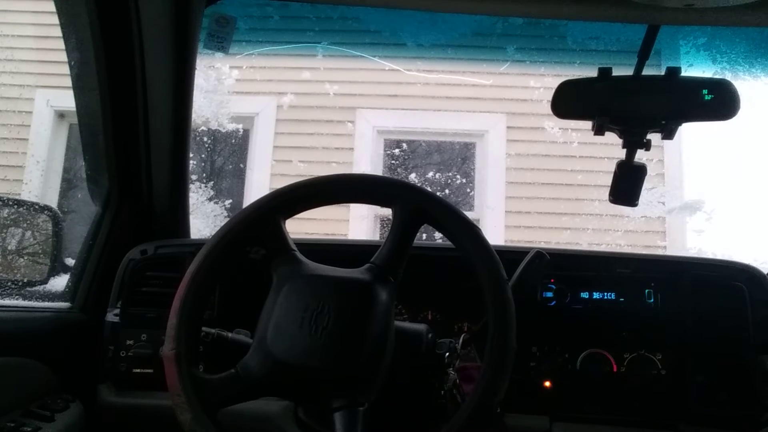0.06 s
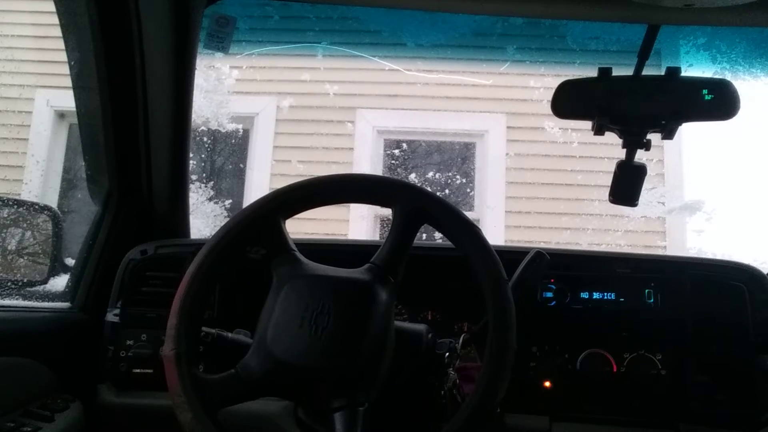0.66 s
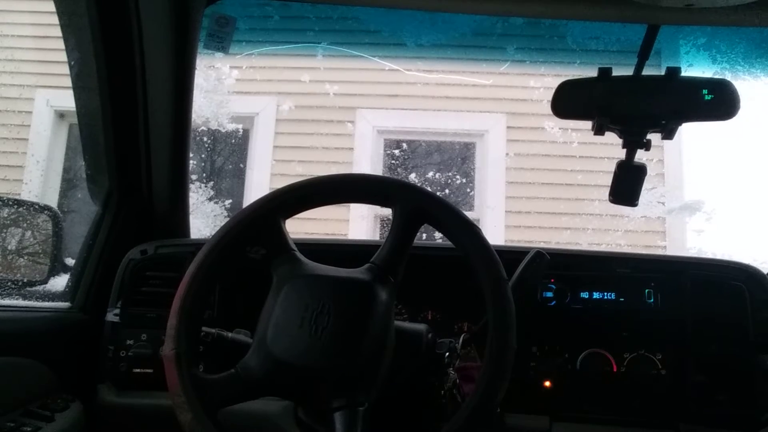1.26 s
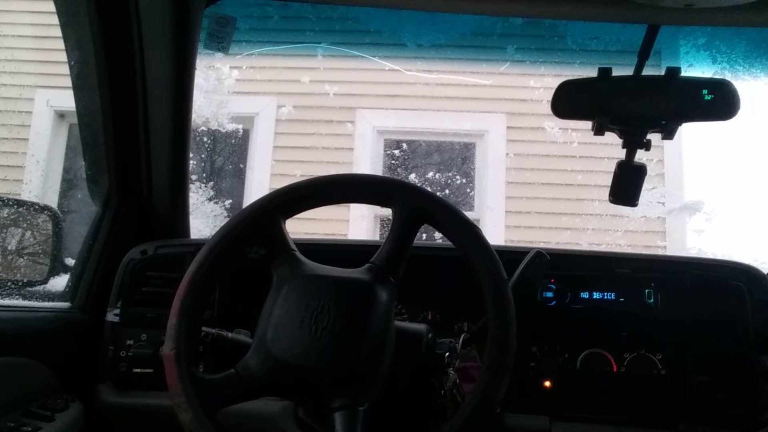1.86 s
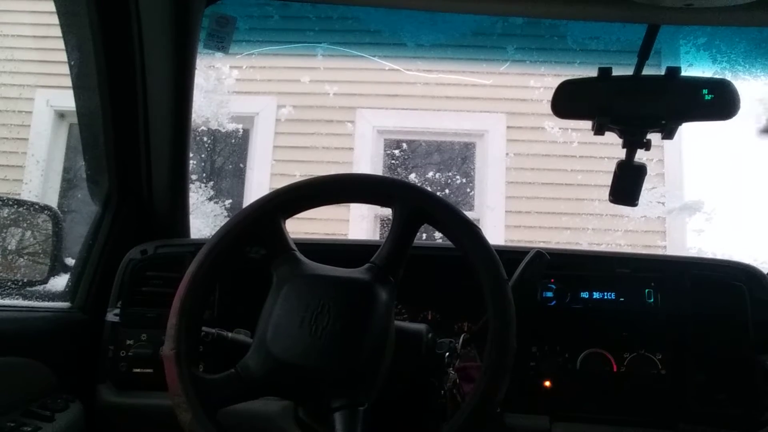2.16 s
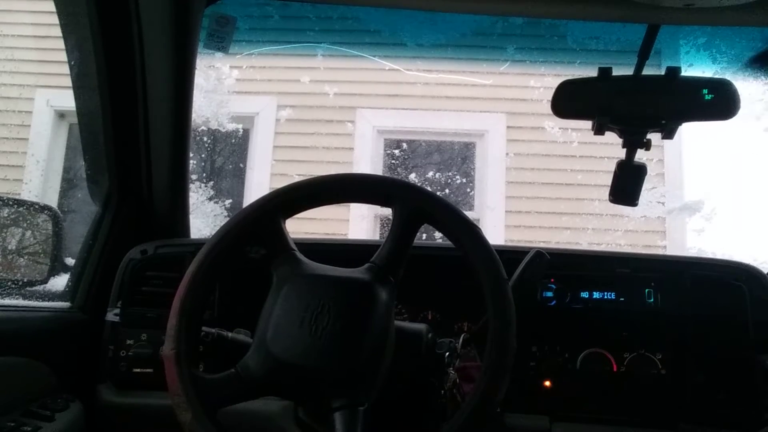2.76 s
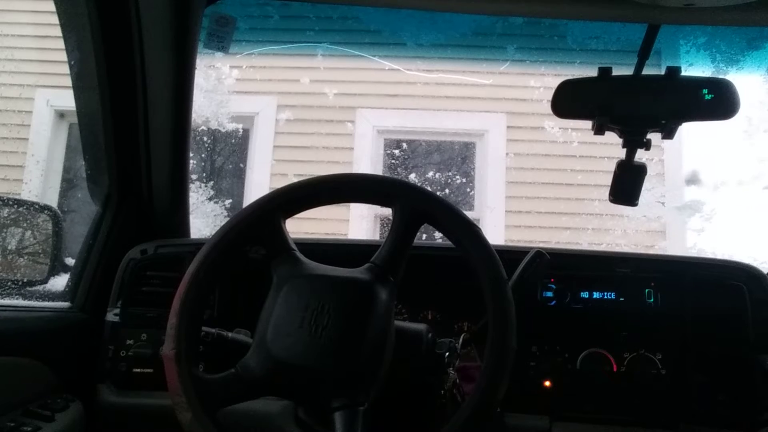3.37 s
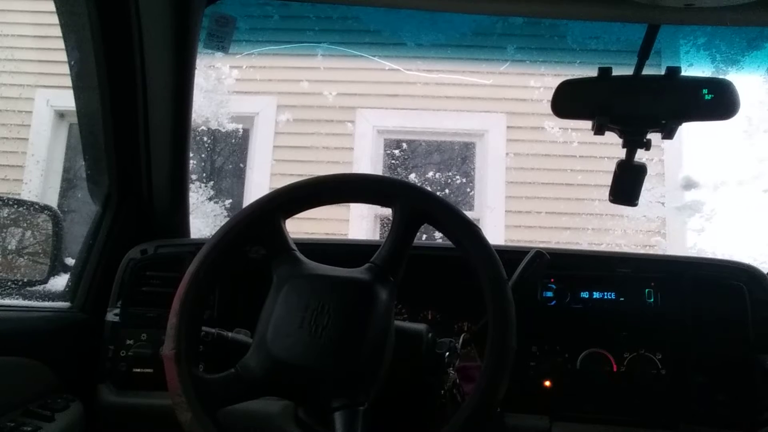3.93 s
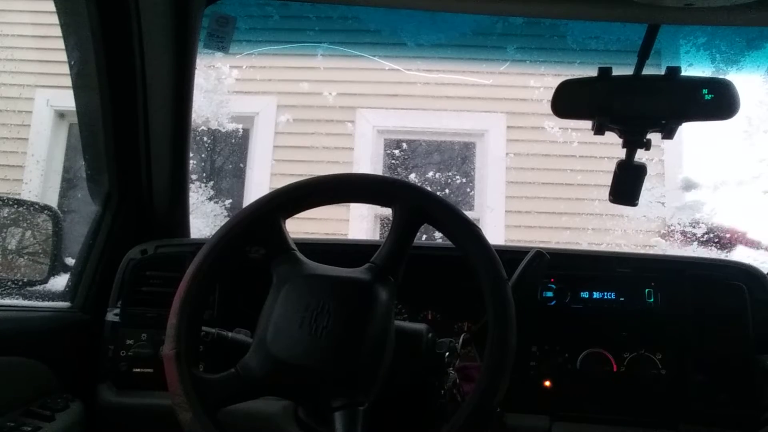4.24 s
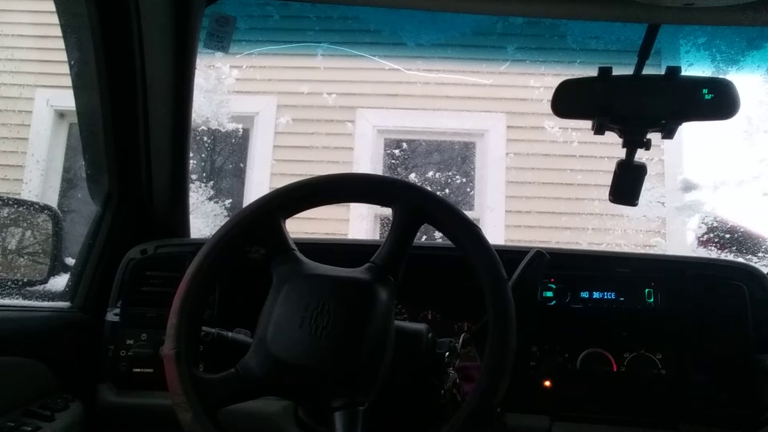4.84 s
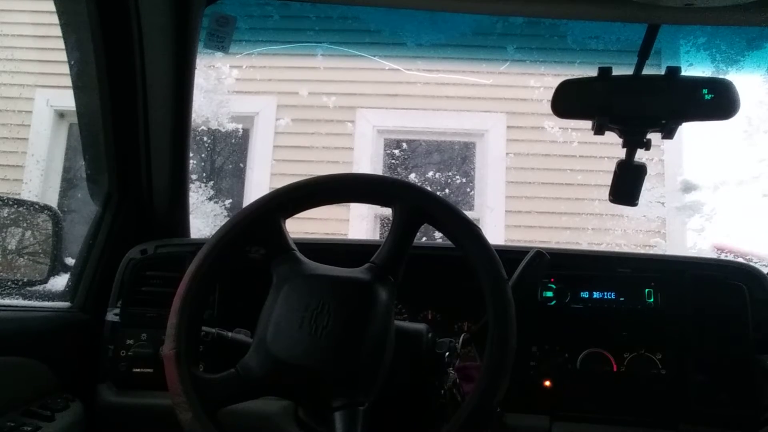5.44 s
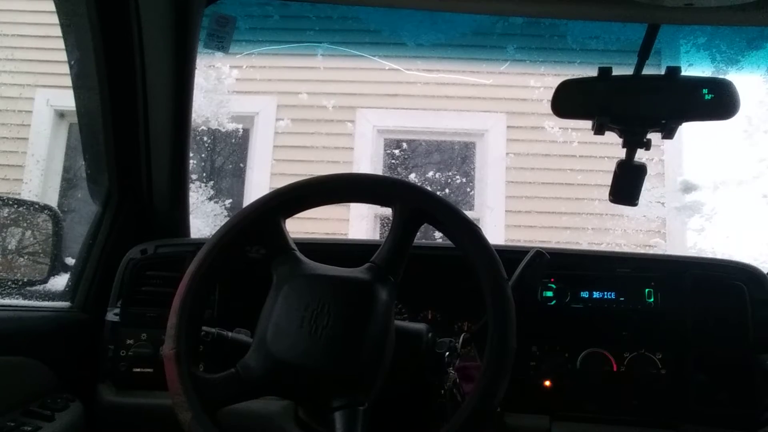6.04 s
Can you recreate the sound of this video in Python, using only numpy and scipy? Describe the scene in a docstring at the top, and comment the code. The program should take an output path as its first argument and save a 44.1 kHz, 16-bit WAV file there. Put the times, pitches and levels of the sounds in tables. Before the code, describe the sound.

Over a steady engine and fan drone in a truck cab, ice is scraped off the windshield in short chipping jabs and three longer strokes.

```python
"""Inside the cab of an idling truck, one microphone, a plastic scraper just beyond the icy windshield.
Engine and heater fan drone throughout. From the start the blade jabs at the ice, squeaks and breaks off
chips; glass and blade ring into the cab. From 0.7 s come three long strokes, rasping as they crush the
frost, the arm leaning in once in each. After 3 s a few faint jabs die away, and at 5 s the scraper
taps the pane once, lightly."""
import sys
import numpy as np
from scipy import signal
from scipy.fft import rfft, irfft
from scipy.io import wavfile
from scipy.ndimage import uniform_filter1d, minimum_filter1d

SR = 44100
rng = np.random.default_rng(int(sys.argv[2]) if len(sys.argv) > 2 else 0)


def persist_wave(psi):
    """Save psi, clipped to +-1, as 16-bit WAV."""
    counts = np.round(np.clip(psi, -1, 1) * 32767).astype(np.int16)
    wavfile.write(sys.argv[1], SR, np.atleast_2d(counts).T)


N = 269010
TIME, FREQS = np.arange(N) / SR, np.fft.rfftfreq(N, 1 / SR)


def gain_of(db):
    """Decibels to gain."""
    return 10 ** (np.asarray(db) / 20)


def unit_rms(x):
    """Scaled to an rms of 1."""
    return x / np.sqrt(np.mean(x ** 2) + 1e-20)


def curve_at(points, hz):
    """Points joined by straight lines on a log-frequency axis."""
    point_hz, value = np.transpose(points)
    return np.interp(np.log(hz + 1), np.log(point_hz + 1), value)


def modes_db(modes, hz):
    """The summed peaks and dips of a set of resonances."""
    return sum(db / (1 + (2 * (hz - centre) / width) ** 2) for centre, width, db in modes)


def add(mix, start_s, sound):
    """Mixes a sound in at start_s."""
    part = mix[max(round(start_s * SR), 0):][:len(sound)]
    part += sound[:len(part)]


def noise(gain):
    """Steady noise of unit rms, its spectrum shaped by gain."""
    return unit_rms(irfft(rfft(rng.standard_normal(N)) * gain, N))


def wavering(hz, width_hz):
    """Noise in one resonance: a wavering tone, or at 0 Hz a random drift."""
    return noise(1 / (1 + ((FREQS - hz) / width_hz) ** 2))


# Engine and heater fan, heard from inside: freq_hz, relative_db
RUMBLE_SPECTRUM = [(20, -59), (36, -51), (60, -22.5), (85, -14.5), (120, -8.5), (180, -4), (260, -0.5),
                   (400, -0.5), (480, -6), (780, -9.5), (900, -5.5), (1100, -14.5), (1500, -25.5),
                   (2500, -66)]
# Air from the vents: freq_hz, relative_db
VENT_SPECTRUM = [(500, -47), (1200, 6), (1700, 4.5), (2400, 0), (3300, -2.5), (4200, -9), (5500, -12),
                 (7400, -13.5), (8400, -32), (10000, -37), (12500, -44), (15000, -87)]
# Low hums in the drone: pitch_hz, width_hz, level_db
HUMS = [(47.8, 2, -71.5), (101.7, 2.1, -61.5), (198.6, 4.7, -49.5)]
def idling(rumble_db=-39, air_db=-50.5, flutter_db=1.0, flutter_hz=12):
    """Engine and blower drone around the microphone; air hisses unevenly from the vents."""
    rumble = gain_of(rumble_db) * noise(gain_of(curve_at(RUMBLE_SPECTRUM, FREQS)))
    flutter = gain_of(flutter_db * wavering(0, flutter_hz))
    air = gain_of(air_db) * noise(gain_of(curve_at(VENT_SPECTRUM, FREQS))) * flutter
    hums = sum(gain_of(db) * wavering(hz, width) for hz, width, db in HUMS)
    return rumble + air + hums


# Short jabs at the ice: start_s, length_s, level_db, low_mid_db (relative)
JABS = [(0, 0.021, -10.5, 0.5), (0.054, 0.0063, -27.5, 1.5), (0.258, 0.059, -50, 2),
        (0.354, 0.11, -43.5, -3), (0.4935, 0.046, -30, -2), (0.553, 0.035, -37.5, -1.5),
        (0.601, 0.17, -48.5, -5), (1.45, 0.065, -38.5, -2.5), (1.6, 0.28, -52, -17),
        (3.172, 0.1, -48.5, -19), (3.314, 0.07, -48, -19), (3.438, 0.07, -48, -17)]
# Pane modes fed or starved where the jabs land: centre_hz, width_hz, gain_db
JAB_SPOT = [(170, 150, -4), (900, 200, 3.5), (1145, 164, -14.5), (1580, 52, 4), (1810, 200, 4),
            (2280, 100, -1), (2450, 130, -6), (2860, 260, 2.5), (4830, 350, 4.5)]
def jabs(attack_s=0.0011, sag_db=5.5, release_s=0.013, powder_db=-53):
    """The blade bites, weakens and lifts off; yields each pass for scraping()."""
    for start, length, db, low_mid_db in JABS:
        span = (TIME > start) & (TIME < start + length + 10 * release_s)
        t = TIME[span] - start
        envelope = np.minimum(t / attack_s, 1) * np.exp(-np.maximum(t - length, 0) / release_s)
        rasp_db = db + 20 * np.log10(envelope) - sag_db * np.minimum(t / length, 1)
        yield span, rasp_db, low_mid_db, powder_db, JAB_SPOT


def cracks(per_s, spread_db):
    """Tiny fractures at random moments, most small and a few large."""
    size = gain_of(spread_db * np.minimum(rng.exponential(1, N), 4))
    return unit_rms(size * rng.choice([-1., 1.], N) * (rng.random(N) < per_s / SR))


def pressed(x, low_db, bend_hz=1600):
    """A harder push bends the whole pane and lifts the low-mids."""
    low = signal.sosfiltfilt(signal.butter(2, bend_hz, fs=SR, output="sos"), x)
    return x - low + low * gain_of(low_db)


def at_spot(x, modes):
    """The colour of one place on the pane."""
    hz = np.fft.rfftfreq(2 * len(x), 1 / SR)
    return irfft(rfft(x, 2 * len(x)) * gain_of(modes_db(modes, hz)))[:len(x)]


def travelling(x, patchy_db=3.0, frames=12, bins=2):
    """As the blade moves over the pane it feeds some modes and starves others."""
    spectra = signal.stft(x, nperseg=512, noverlap=384)[2]
    patches = uniform_filter1d(rng.standard_normal(spectra.shape), bins, 0)
    patches = uniform_filter1d(patches, frames, 1)
    gain = unit_rms(gain_of(patchy_db * unit_rms(patches)))
    return signal.istft(spectra * gain, nperseg=512, noverlap=384)[1][:N]


def scraping(passes, trim_db=-3.0, press_db=8.5, fizz_db=14.5, judder_db=1.24, judder_hz=125):
    """The moving edge crushes frost; it sticks and slips, so the fractures come in clumps."""
    stick_slip = noise(FREQS / (judder_hz ** 2 + FREQS ** 2) / (1 + FREQS / judder_hz))
    frost = unit_rms(cracks(per_s=11000, spread_db=1.5) * gain_of(judder_db * stick_slip))
    snaps = gain_of(-10) * cracks(per_s=350, spread_db=2.5)
    crush = unit_rms(frost + snaps)
    force, powder, effort = np.zeros((3, N))
    for span, rasp_db, low_mid_db, powder_db, spot in passes:
        level = gain_of(trim_db + rasp_db)
        rasp = crush[span] * level
        effort[span] += level
        force[span] += at_spot(pressed(rasp, press_db + low_mid_db), spot)
        powder[span] += rasp * gain_of(fizz_db + powder_db)
    return groan(effort) + windshield(travelling(force)) + fizz(powder)


# Crushed ice, heard from the cab side of the glass: freq_hz, relative_db
ICE_SPECTRUM = [(40, -68), (110, -19.5), (200, 2), (500, -5), (1100, -1), (1600, 0), (2300, -2.5),
                (3000, 5.5), (3900, -1), (4500, -5), (7500, -11.5), (8400, -35.5), (11000, -44),
                (15500, -81)]
# Resonances of windshield and scraper: centre_hz, width_hz, gain_db
GLASS_MODES = [(280, 88, 8), (552.5, 83, 11), (795, 190, 4), (886, 36, 6), (1107, 103, 5.5),
               (1232, 55, 8.5), (1630, 170, -1.5), (2033, 110, 4.5), (2254, 103, 9), (2594, 235, 5),
               (3065, 42, -21.5), (3200, 840, 0.5), (4830, 220, 2.5), (6160, 700, 2.5), (6900, 240, 6)]
def windshield(x, size=4096):
    """The pane rings as it carries the blade's force through to the cab."""
    hz = np.fft.rfftfreq(size, 1 / SR)
    gain = gain_of(curve_at(ICE_SPECTRUM, hz) + modes_db(GLASS_MODES, hz))
    gain /= np.sqrt(np.mean(gain ** 2 * (hz > 2000)))
    log_gain = np.log(np.r_[gain, gain[-2:0:-1]])
    ring = np.fft.ifft(np.exp(np.conj(signal.hilbert(log_gain)))).real  # minimum phase: no pre-ring
    return signal.oaconvolve(x, ring[:size // 2])[:N]


# Fine spray of frost powder: freq_hz, gain_db
POWDER_SPECTRUM = [(4000, -41), (7300, 29), (8400, 13.5), (10000, 0.5), (12500, -6.5), (15500, -4)]
def fizz(x):
    """The thin top that passes the glass from the finest fractures."""
    return irfft(rfft(x) * gain_of(curve_at(POWDER_SPECTRUM, FREQS)), N)


# Reverberation of the cab: freq_hz, t60_s
CAB_DECAY = [(200, 0.013), (1300, 0.062), (3500, 0.044), (8000, 0.037)]
def cab(x, wet_db, size=8192):
    """Dense short reflections from upholstery close around the microphone, even in colour overall."""
    hz, t, spectra = signal.stft(rng.standard_normal(size), SR, nperseg=128)
    decay = gain_of(-60 * t / curve_at(CAB_DECAY, hz)[:, None])
    tail = signal.istft(spectra * decay, SR)[1][:size]
    echoes = gain_of(wet_db) * tail / np.linalg.norm(tail)
    echoes[0] += 1  # direct sound
    response = rfft(np.r_[np.zeros(size), echoes])
    response /= np.sqrt(uniform_filter1d(abs(response) ** 2, size=40))
    return signal.oaconvolve(x, irfft(response))[size:size + N]


# The blade chatters at a resonance: start_s, length_s, pitch_hz, slide_hz, level_db, fall_db, waver_hz
SQUEAKS = [(0, 0.029, 2900, -150, -10, 7, 65), (0.03, 0.0083, 2800, -40, -16.5, 2, 40),
           (0.046, 0.022, 2940, -220, -27, 3, 55), (0.522, 0.025, 2860, -30, -32, 7, 60),
           (1.838, 0.14, 3820, 79, -54, -8, 110), (2.665, 0.026, 1227, -17, -30.5, 14, 35),
           (2.674, 0.043, 3530, -120, -38, 9, 130), (2.75, 0.067, 3480, 57, -36, 7, 150)]
def squeaks(rough_db=3, rough_hz=170):
    """Pressed hard, the blade gives a brief rough squeak whose pitch slides as it bends."""
    out = np.zeros(N)
    waver = wavering(0, rough_hz)
    grip = gain_of(rough_db * wavering(0, rough_hz))
    for start, length, hz, slide_hz, db, fall_db, waver_hz in SQUEAKS:
        span = (TIME >= start) & (TIME < start + length)
        progress = (TIME[span] - start) / length
        pitch_hz = hz + slide_hz * progress + waver_hz * waver[span]
        tone = unit_rms(grip[span] * np.sin(2 * np.pi * np.cumsum(pitch_hz) / SR))
        envelope = gain_of(db - fall_db * progress) * signal.windows.tukey(len(tone), .15)
        add(out, start, tone * envelope)
    return out


def blade(force, hz, q=5.8):
    """The plastic blade rings; its pitch depends on where the edge is loaded."""
    return signal.lfilter(*signal.iirpeak(hz, q, SR), force)


# The blade catches on the ice: start_s, level_db, low_mid_db (relative), ring_hz, decay_s
CHIPS = [(0.0342, -16, 5.5, 2820, 0.0022), (0.087, -41, -12, 3500, 0.0022), (0.212, -41, -10, 3000, 0.0036),
         (0.229, -41.5, 9, 3500, 0.004), (0.272, -37.5, 12, 3550, 0.0058), (0.286, -41, 8, 3000, 0.003),
         (0.365, -29.5, 6, 3600, 0.0022), (0.39, -30.5, 6, 2980, 0.0031), (0.416, -27, 2, 2900, 0.0018),
         (0.4387, -31.5, 9, 4300, 0.003), (0.4508, -28, -2, 4100, 0.0018), (0.4723, -36.5, 8, 3000, .003),
         (0.4865, -32, -2, 3800, .003), (0.4937, -21.5, 4.5, 3600, 0.008),
         (0.5225, -25.5, -10, 3450, 0.0025), (0.5286, -25, 6, 2850, 0.0028),
         (0.5618, -24, -7, 2960, 0.0032), (0.663, -39, -14, 2960, 0.0038),
         (0.6787, -35.5, -6, 4800, 0.0027), (0.7019, -29.5, 7, 5000, 0.0026),
         (0.780, -28.5, 3, 3340, 0.0034), (0.827, -30, 13, 3300, .0025), (0.862, -22, -1, 3830, 0.0034),
         (0.876, -21.5, -2, 3900, 0.0022), (0.9011, -23, 4, 2600, 0.0022), (0.937, -22, 3, 3960, 0.0042),
         (0.96, -21, 8, 6300, 0.0034), (1.017, -26, 4, 2700, 0.0032), (1.037, -31.5, 22, 2700, 0.0013),
         (1.5055, -29, 11, 2700, 0.0023), (1.731, -36, 15, 2620, 0.0023), (1.7467, -23, 1.5, 3100, 0.0056),
         (1.7674, -32, 9, 3400, 0.0016), (2.009, -28, 8.5, 3200, 0.0035), (2.124, -25, 8.5, 3000, 0.002),
         (2.288, -33, -13, 6840, .003), (2.665, -31, 4, 3500, 0.0046), (2.764, -24.5, -13, 6040, .0035),
         (2.797, -25.5, -1, 4100, 0.005), (2.9078, -34, 7, 1200, 0.0033), (2.945, -37.5, 0, 3900, 0.0044),
         (3.006, -39, -4, 4200, 0.004)]
def chips(trim_db=-1.5, press_db=-2, rise_s=0.00033, ring_db=3, powder_db=-53):
    """A flake breaks off: a quick burst of fractures, and the freed blade rings."""
    t, force = TIME[:SR // 10], np.zeros(N)
    crush = cracks(per_s=22000, spread_db=4.5)
    for start, db, low_mid_db, ring_hz, decay_s in CHIPS:
        burst = (1 - np.exp(-t / rise_s)) * np.exp(-t / decay_s)
        fractures = crush[round(start * SR):][:len(t)]
        grains = unit_rms(fractures * burst) * np.sqrt(np.mean(burst ** 2))
        flake = gain_of(db + trim_db) * grains / burst.max()
        ring = gain_of(ring_db) * blade(flake, ring_hz)
        add(force, start, pressed(flake, low_mid_db + press_db) + ring)
    return windshield(force) + gain_of(powder_db) * fizz(force)


# The pane flexes under the heaviest pushes: start_s, pitch_hz, level_db
THUDS = [(0.498, 240, -31.5), (1.039, 265, -29), (2.027, 159, -29), (2.813, 336, -32.5)]
def thuds(swell_s=0.0082):
    """The whole pane gives a little and settles."""
    t, out = TIME[:SR // 10], np.zeros(N)
    envelope = t / swell_s * np.exp(1 - t / swell_s)
    for start, hz, db in THUDS:
        add(out, start, gain_of(db) * envelope * np.sin(2 * np.pi * hz * t))
    return out


# Rasp of the long strokes, one curve each: time_s, level_db
STROKE_CURVES = [
    [(0.745, -50), (0.763, -35), (0.794, -38.5), (0.805, -32.5), (0.875, -31), (0.92, -28.5), (1.0, -28.5),
     (1.05, -25.5), (1.1, -36), (1.13, -65)],
    [(1.825, -53), (1.85, -51), (1.905, -42), (1.93, -34.5), (1.985, -33.5), (2.016, -24.5), (2.04, -29.5),
     (2.095, -24.5), (2.13, -24.5), (2.163, -37.5), (2.29, -40), (2.32, -52)],
    [(2.655, -64), (2.668, -35), (2.725, -31.5), (2.745, -36.5), (2.768, -30.5), (2.802, -28),
     (2.865, -33.5), (2.895, -43), (2.98, -44), (3.025, -37.5), (3.16, -51)],
]
# Pane modes fed or starved, one set per stroke: centre_hz, width_hz, gain_db
STROKE_SPOTS = [
    [(300, 230, -3), (644, 110, -4), (950, 200, 4.5), (1790, 210, -5), (2580, 220, 2), (3960, 180, 3),
     (4530, 280, -5)],
    [(260, 160, -2), (704, 140, 5), (2010, 110, 3), (2780, 400, -2.5), (3800, 260, 3.5)],
    [(300, 300, -1), (2000, 72, 1.5), (2770, 500, -3.5), (3450, 300, 2), (4000, 300, -0.5), (6300, 1300, 2)],
]
# The arm leans in once per stroke: peak_s, half_length_s, low_mid_rise_db
PUSHES = [(1.055, 0.063, 2.5), (2.088, 0.057, 0.5), (2.84, 0.08, 4.5)]
def long_strokes(glide_db=-7, powder_db=-51.5):
    """The blade glides with thin low-mids that fill under a push; yields each pass for scraping()."""
    low_mid_db = glide_db + sum(db * leaning(peak, half) for peak, half, db in PUSHES)
    for curve, spot in zip(STROKE_CURVES, STROKE_SPOTS):
        times, db = np.transpose(curve)
        span = (TIME >= times[0]) & (TIME <= times[-1])
        yield span, np.interp(TIME[span], times, db), low_mid_db[span], powder_db, spot


def leaning(peak_s, half_s):
    """The weight of one push, swelling to 1 and easing off."""
    return np.exp(-((TIME - peak_s) / half_s) ** 2)


def groan(effort, pitch_hz=1073, width_hz=53, relative_db=-1):
    """Pushed hard in a long stroke, the pane sounds a note of its own."""
    weight = sum(leaning(peak, half) for peak, half, _ in PUSHES)
    return gain_of(relative_db) * wavering(pitch_hz, width_hz) * effort * weight


# The last light tap: start_s, level_db, snap_db (relative)
TAP = (4.981, -28, -20)
# Colour of its snap: freq_hz, gain_db
SNAP_SPECTRUM = [(4900, -15), (5900, 15), (7300, 26), (8400, 10), (10000, -5), (13000, -5), (14800, 3)]
# Pane modes fed or starved where it lands: centre_hz, width_hz, gain_db
TAP_SPOT = [(2420, 980, 3), (3180, 260, -3.5), (3680, 320, 3), (4700, 1600, -5.5), (5870, 500, 5),
            (7300, 700, 2)]
def tap(decay_s=0.0033, low_db=-6, ring_db=-1, ring_hz=3600, snap_s=0.0011):
    """Hard plastic meets the pane: a crisp snap and a short ring of the blade."""
    start, db, snap_db = TAP
    t = TIME[:SR // 10]
    force, edge = np.zeros((2, N))
    contact = gain_of(db) * rng.standard_normal(len(t))
    add(force, start, contact * np.exp(-t / decay_s))
    add(edge, start, gain_of(snap_db) * contact * np.exp(-t / snap_s))
    knock = pressed(force, low_db, bend_hz=2400) + gain_of(ring_db) * blade(force, ring_hz)
    snap = irfft(rfft(edge) * gain_of(curve_at(SNAP_SPECTRUM, FREQS)), N)
    return at_spot(windshield(knock), TAP_SPOT) + snap


def scene():
    """From inside the cab, in mono: the scraper through the glass, over the drone."""
    rasps = cab(scraping([*jabs(), *long_strokes()]), wet_db=-3.5)
    clicks = cab(chips() + tap(), wet_db=-0.5)
    return (rasps + clicks + squeaks() + thuds() + idling())[None]


def record(dry, ceiling=0.64, hold_samples=90, cutoff_hz=15700):
    """After the microphone, a limiter holds down the highest peaks and a low-pass trims the top."""
    needed_gain = np.minimum(ceiling / (abs(dry) + 1e-9), 1)
    smooth_gain = uniform_filter1d(minimum_filter1d(needed_gain, hold_samples), hold_samples)
    lowpass = signal.firwin(511, cutoff_hz, window=("kaiser", 9), fs=SR)
    return signal.oaconvolve(dry * smooth_gain, lowpass[None], "same")


dry = scene()
out = record(dry)
persist_wave(out)
```